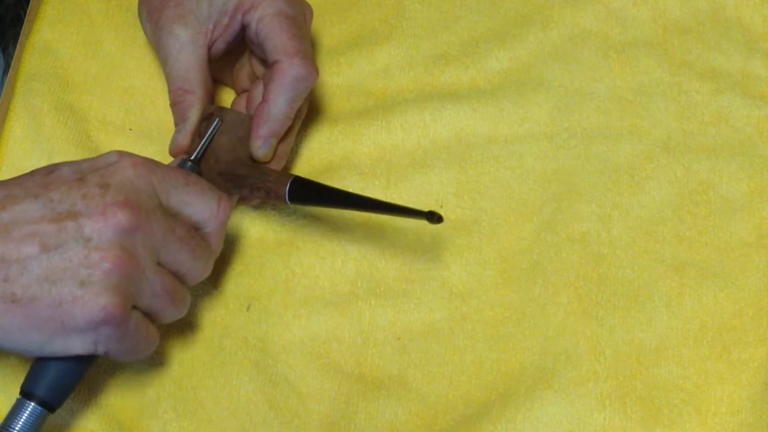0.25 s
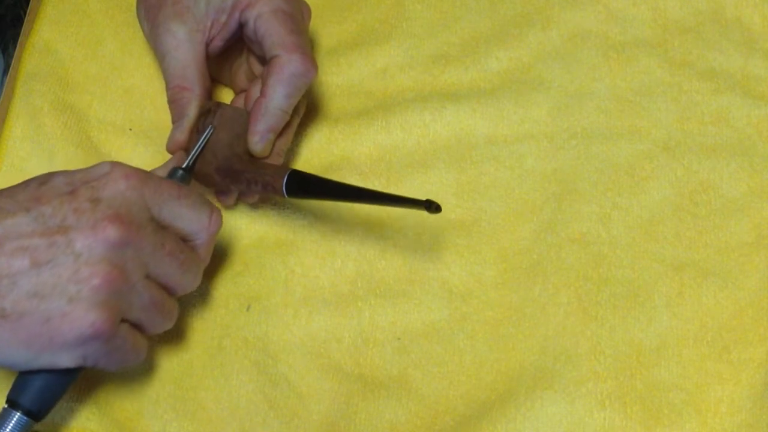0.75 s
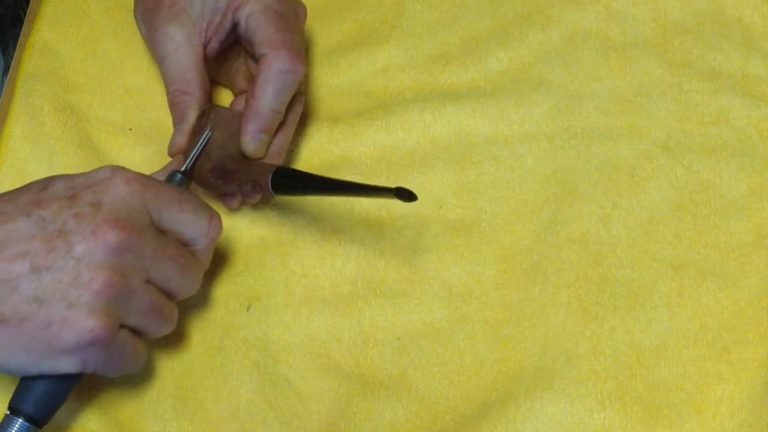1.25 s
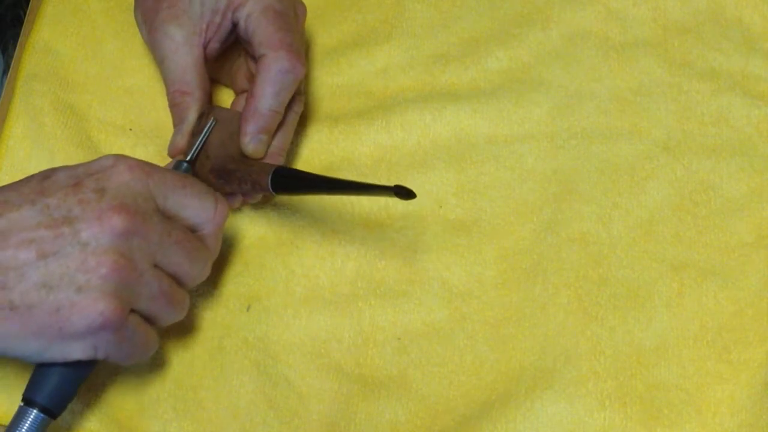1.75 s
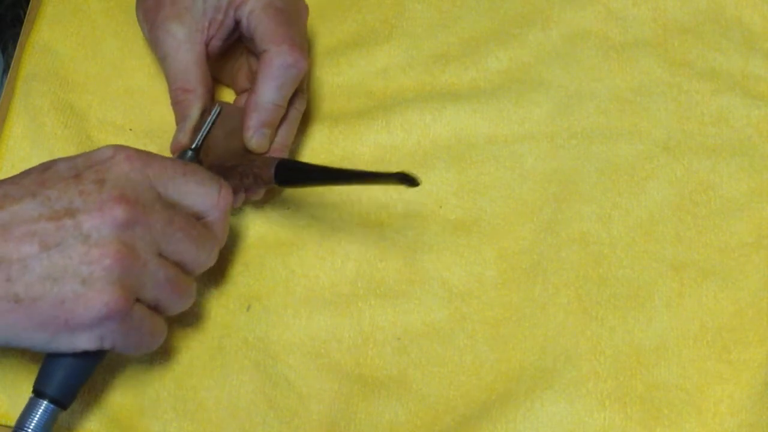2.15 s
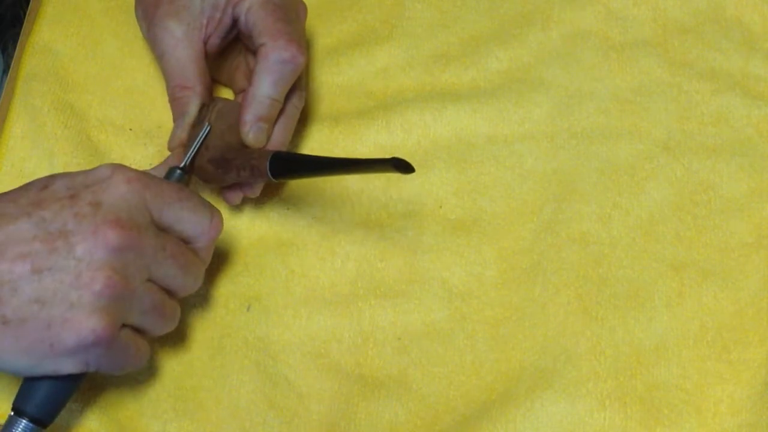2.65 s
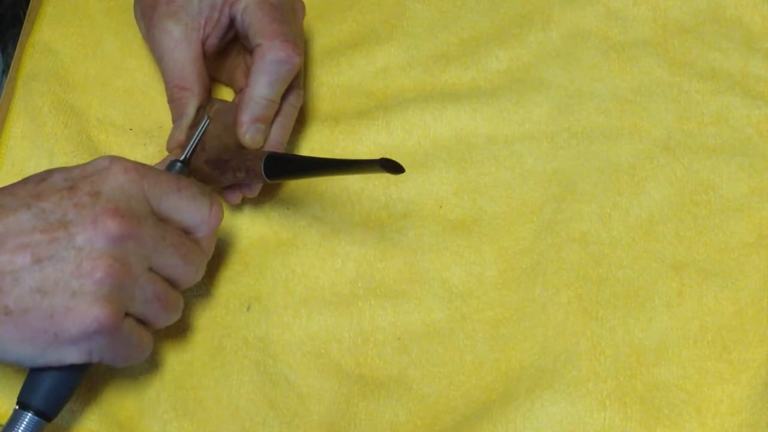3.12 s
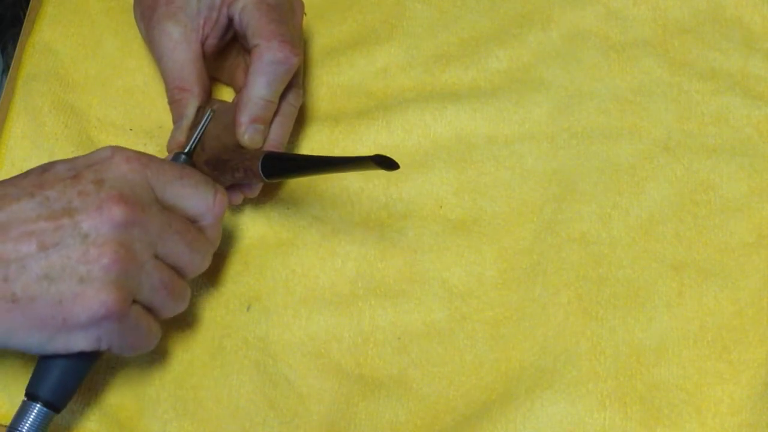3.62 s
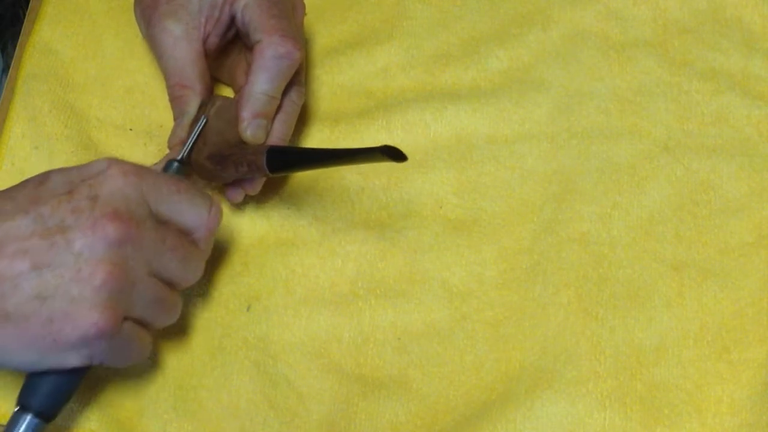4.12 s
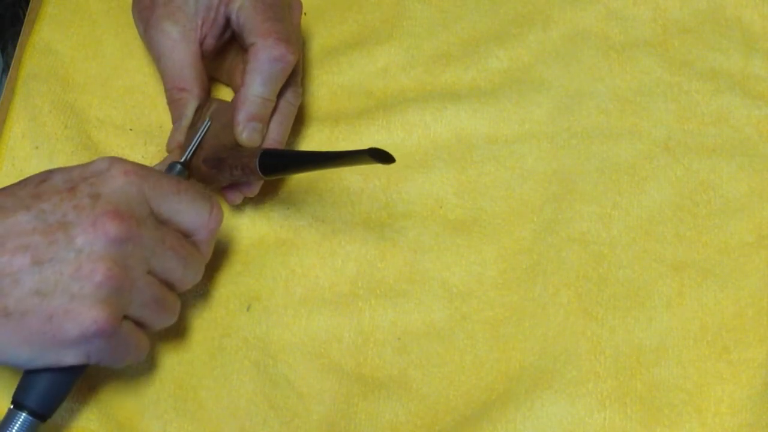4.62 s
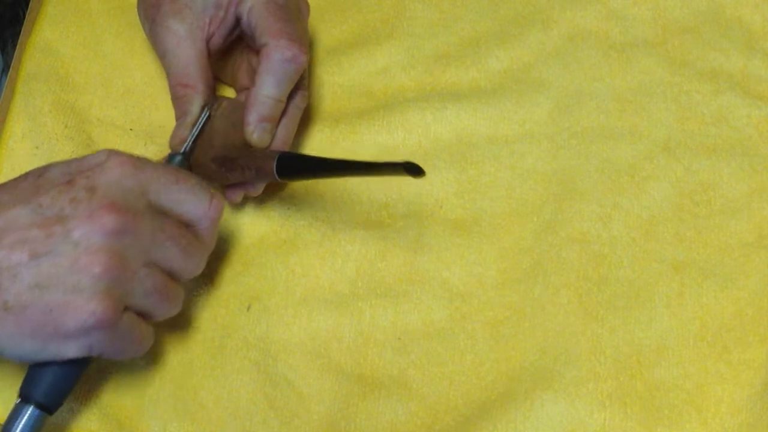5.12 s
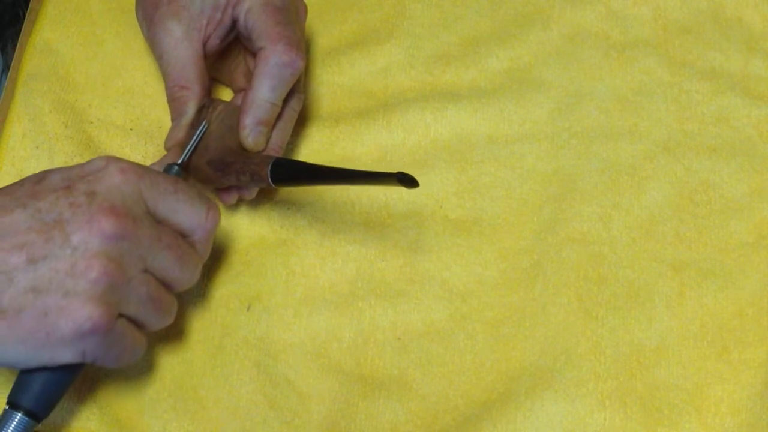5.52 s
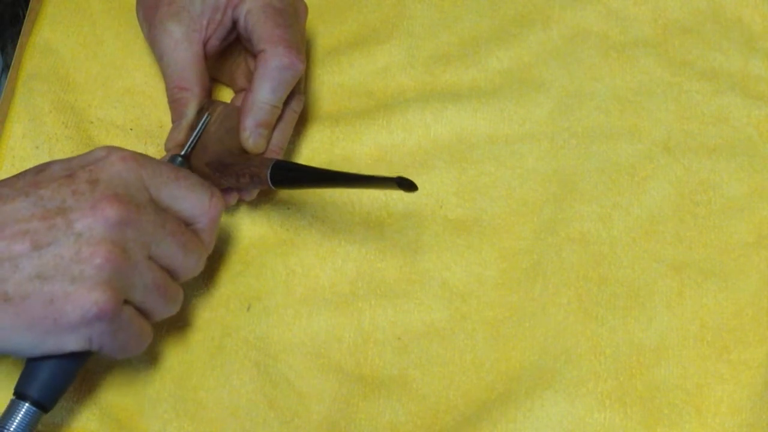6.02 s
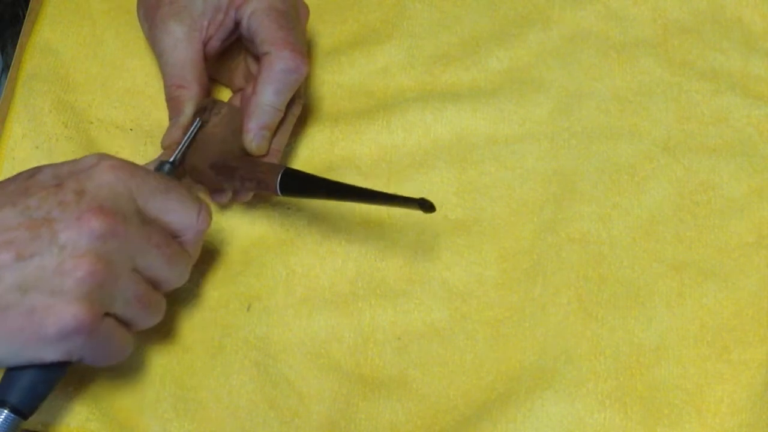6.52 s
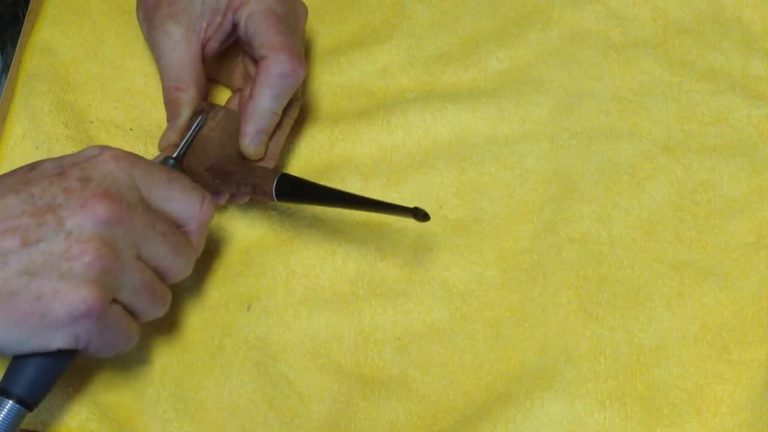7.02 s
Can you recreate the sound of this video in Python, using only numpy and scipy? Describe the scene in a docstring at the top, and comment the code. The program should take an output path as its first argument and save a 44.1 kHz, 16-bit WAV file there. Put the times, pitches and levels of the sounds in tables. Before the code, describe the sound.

Close up in a small room, a metal burr grinds into a small wooden bowl in repeated bursts. Each contact jumps out much louder than the idling motor: a gritty, buzzing rasp with fizzing torn fibres, woody resonance and a shrill chatter that sometimes squeals. Between bursts the steady whirr, mains-throbbing whine and soft air rush of the tool are exposed. Motor pitch wavers slightly and ends a little higher, mid-cut.

```python
"""A rotary tool at about 13000 rpm is already pressing its burr into a wooden pipe bowl as the sound opens.
Seven strokes follow one another, parted by short lifts; the seventh is still cutting at the end.
Throughout, the motor hums on its shaft orders, its commutator whine throbs with the chopped mains and its fan rushes.
In each stroke the burr bites once a turn: blows and torn fibres ring wood and steel, and strong chatter squeals.
A small room answers the motor and the cut."""
import sys
import numpy as np
from scipy import signal
from scipy.fft import rfft, irfft, next_fast_len
from scipy.io import wavfile
from scipy.ndimage import uniform_filter1d, map_coordinates

SR = 44100
rng = np.random.default_rng(int(sys.argv[2]) if len(sys.argv) > 2 else 0)


def master_out(mix):
    """Clip the mix to full scale and print it as 16-bit PCM to the path in sys.argv[1]."""
    frames = np.transpose(np.atleast_2d(mix))
    ceiling = np.clip(frames, -1, 1)
    pcm = np.round(ceiling * 32767).astype(np.int16)
    wavfile.write(sys.argv[1], SR, pcm)


N = 320166

# rotation of the shaft: (time_s, speed_turns_per_s)
SHAFT_SPEED = [(0.0, 209.0), (0.1, 208.4), (0.44, 211.9), (0.97, 207.2), (1.23, 212.6), (1.41, 212.4),
               (1.64, 209.1), (2.12, 205.4), (2.38, 212.1), (2.79, 218.4), (2.93, 214.5), (3.3, 215.6),
               (3.78, 205.4), (3.82, 202.3), (3.98, 204.3), (4.25, 213.2), (4.45, 217.4), (4.69, 215.9),
               (5.02, 209.9), (5.52, 220.1), (5.78, 219.4), (6.03, 213.6), (6.91, 224.9), (7.26, 223.5)]
# lines of shaft, fan and bearings, before the housing: (shaft_multiple, level_db)
WHINE_ORDERS = [(2, -75), (5, -71), (8, -69), (13, -72), (17, -74), (19, -74), (21, -73), (27, -73),
                (29, -73), (35, -72), (37, -65.5), (40, -65.5), (43, -76), (48, -74), (50, -77),
                (56, -68.5), (64, -82)]
# lines driven by the current pulses: (shaft_multiple, level_db)
COMMUTATOR_ORDERS = [(8, -61.5), (16, -51.3)]
# rougher lines of the ball bearings, before the housing: (shaft_multiple, level_db)
BEARING_ORDERS = [(6.05, -60), (9.08, -63), (12.12, -67), (21.2, -68)]
# the hum's strongest line, the fourth shaft order: (time_s, level_db)
FOURTH_ORDER = [(0.0, -59.5), (0.38, -57.5), (0.93, -68), (1.01, -56), (1.88, -67), (2.47, -56.5),
                (2.93, -63.5), (3.09, -56.5), (3.88, -64.5), (3.9, -56), (4.02, -58.5), (4.49, -57),
                (4.89, -72), (4.99, -58), (5.68, -58), (6.03, -71), (6.13, -58), (7.26, -63)]
# spectrum of the brushes' ticking: (frequency_hz, relative_level_db)
BRUSH_SPECTRUM = [(500, -25), (1500, 0), (6000, 0), (9000, -2), (12000, -4), (15000, -12)]
# what the motor's housing lets out of the gliding lines: (frequency_hz, gain_db)
HOUSING_GAIN = [(1310, 0), (1370, -6), (1600, 0), (12100, 0), (12500, -6)]
# spectrum of the cooling air with the room's rumble: (frequency_hz, relative_level_db)
AIR_SPECTRUM = [(25, -22), (60, -9.5), (190, -5.5), (320, -10.5), (560, -6), (950, -4.5), (1300, .5),
                (1480, -3.5), (2100, -1.5), (2650, 1.2), (3000, -4), (3500, -2), (4500, 2.3), (5200, -4),
                (6800, -8.5), (8500, -7.3), (11000, -14), (15300, -16)]
# strokes of the burr; the spot it works on favours some parts:
# (start_s, end_s, landing_s, lift_off_s, first_pressure_db, middle_pressure_db, last_pressure_db,
#  extra_bowl_db, extra_chatter_db, extra_shank_db, extra_fizz_db)
BURR_STROKES = [(-.1, 0.208, .01, .06, 2, -0.5, 2, 1.3, -3.5, -8, -3.5),
                (0.23, 1.007, 0.022, 0.018, -8.5, -0.5, -3.5, -0.81, 0, -4.5, -3.5),
                (1.211, 2.199, .03, .05, -5.5, -2.5, 4.5, -0.75, 0.5, 0.5, 3.5),
                (2.77, 4.049, 0.021, 0.073, -6, 0.5, 5.5, 1.7, 1, 1.5, 1.5),
                (4.383, 5.112, .04, .01, -7.5, 0, 0.5, -0.7, -0.5, -2.5, 3),
                (5.484, 6.414, .025, 0.055, -2.5, -2, -2, 2.6, -2.5, -.5, 0),
                (6.893, 7.4, 0.0011, .03, -2, -2.5, 2, 2.7, 0.5, -1, -1)]
# the burr digs into the grain or, below zero, skims it: (centre_s, half_length_s, extra_pressure_db)
GRAIN_SNAGS = [(0.077, .015, 3.5), (0.301, .02, 8), (0.392, .04, -1.5), (0.66, 0.028, 1.5),
               (0.835, 0.018, 4.5), (1.565, 0.058, 5), (1.931, 0.0063, 5.5), (3.287, 0.09, -4.5),
               (3.67, 0.033, 3.5), (3.857, .025, 2), (4.792, 0.044, 0.5), (4.943, 0.053, 3.5),
               (5.093, 0.0041, 5.5), (5.839, .025, 6.5), (6.347, .018, 4.5), (6.899, .01, 5.5),
               (6.96, 0.011, 4), (7.08, 0.065, -4.5)]
# one part is struck just right and sings out: (centre_s, half_length_s, part, extra_level_db)
PART_FLARES = [(2.09, .03, "rasp", 2.5), (5.975, 0.063, "rasp", 11.5), (0.783, 0.1, "bowl", 7.5),
               (.96, 0.075, "bowl", 5), (2.128, .02, "bowl", 7), (3.0, 0.028, "bowl", 2),
               (3.95, 0.044, "bowl", 4.5), (5.87, .04, "bowl", 1), (1.744, 0.11, "chatter", 5),
               (3.105, 0.12, "chatter", 5.5), (3.867, 0.033, "chatter", 11.5), (6.11, 0.072, "chatter", 11),
               (.58, .04, "shank", 7.5), (0.8, 0.14, "shank", 16.5), (2.851, .035, "shank", 17.5),
               (4.6, 0.13, "shank", 14), (5.834, 0.038, "shank", 12), (.01, 0.033, "fizz", 10),
               (3.98, 0.041, "fizz", 4)]
# each part's answer to pressure: part: (level_db at normal pressure, growth_db_per_db of pressure)
PART_DRIVE = {"rasp": (-43.5, 1.1), "bowl": (-50, 0.32), "chatter": (-44.5, 1.23), "shank": (-56.5, .25),
              "fizz": (-48, 1.26)}
# resonances of the four ringing parts: (frequency_hz, width_hz, relative_level_db)
RASP_MODES = [(3324, 380, 10.5), (3870, 280, 12), (4790, 375, 6), (4930, 200, -20), (5470, 280, 2)]
BOWL_MODES = [(1055, 20, -10), (1389, 51, 11), (1644, 97, 6.5), (1914, 67, 8), (2178, 220, 0),
              (2397, 44, 8)]
CHATTER_MODES = [(2680, 86, 2), (2792, 104, 7), (3058, 113, 0), (3050, 43, 6.5)]
SHANK_MODES = [(5850, 266, -10), (5940, 86, -2)]
# spectrum of the tearing fibres: (frequency_hz, relative_level_db)
FIBRE_SPECTRUM = [(100, -46), (500, -43), (1100, -5.5), (4000, 3.5), (6600, -8), (7200, -8.5), (8100, -2),
                  (8700, 2), (9400, -2), (10300, -11), (12600, -11.5), (13400, -10.5), (14200, -12),
                  (15300, -27)]
# decay of the room: (frequency_hz, t60_s)
ROOM_DECAY = [(200, .25), (3000, .2), (12000, .14)]

MAINS_HZ, SQUEAL_HZ, TOP_HZ = 59.983, 3025, 15300
# the hand trembles; each part's share wanders
TREMBLE_DB, WANDER_DB = 0.07, 1.42
# pressure at which the cut reaches its full depth
FULL_CUT_DB = 7
# third shaft order: level in dB, gain in dB with the burr on the wood, gain in dB per turn/s below mean speed
THIRD_DB, THIRD_LOAD_DB, THIRD_SLOWING_DB = -69.5, 5, .25


def amp(db):
    """Decibel law: 20 dB is a tenfold amplitude."""
    return 10 ** (np.asarray(db) / 20)


def unit(x):
    """Normalization: x at rms 1."""
    return x / np.sqrt(np.mean(x ** 2) + 1e-20)


def clock():
    """Sampling: the time of each sample in seconds."""
    return np.arange(N) / SR


def along(points, hz):
    """Logarithmic interpolation: (frequency, value) points read on a log axis."""
    frequency, value = np.transpose(points)
    return np.interp(np.log(hz + 1), np.log(frequency + 1), value)


def curves(rows):
    """Linear interpolation: one value per sample for each column after the time."""
    time_s, *columns = np.transpose(rows)
    return [np.interp(clock(), time_s, column) for column in columns]


def wobble(rate, size=64):
    """Band-limited randomness: a smooth curve through rate random knots a second."""
    coarse = np.arange(0, N + size, size)
    knots = rng.standard_normal(4096)
    smooth = map_coordinates(knots, [coarse * rate / SR], mode="mirror")
    return np.interp(np.arange(N), coarse, smooth)


def swell(at, half_length):
    """Gaussian envelope: a bell-shaped rise and fall around a moment."""
    return np.exp(-((clock() - at) / half_length) ** 2)


def filtered(x, response):
    """Linear filtering: x times a complex response of frequency."""
    m = next_fast_len(N + SR // 2)
    return irfft(rfft(x, m) * response(np.fft.rfftfreq(m, 1 / SR)), m)[:N]


def coloured(x, spectrum):
    """Spectral shaping: x weighted by the given spectrum, at rms 1."""
    return unit(filtered(x, lambda hz: amp(along(spectrum, hz))))


def rung(x, modes):
    """Modal superposition: x through parallel resonances of alternating sign, at rms 1."""
    def response(hz):
        total = 0
        for k, (centre, width, db) in enumerate(modes):
            damping = 1j * hz * width
            total = total + (-1) ** k * amp(db) * damping / (centre * centre - hz * hz + damping)
        return total

    return unit(filtered(x, response))


def shaft(flutter):
    """Rotation: angle in radians is the integral of speed, here slightly unsteady."""
    speed, = curves(SHAFT_SPEED)
    return 2 * np.pi * np.cumsum(speed) / SR + flutter * wobble(25)


def orders(angle, lines, waver_db, drift, drift_rate=30):
    """Order locking: lines at multiples of the shaft angle, each wavering in level and phase."""
    total = np.zeros(N)
    for k, db in lines:
        level = amp(db + waver_db * (wobble(3.156) + wobble(22)))
        total += level * np.sin(k * angle + drift * wobble(drift_rate))
    return np.sqrt(2) * total


def once_a_turn(angle, scatter, change_rate, shift_db, count=68):
    """Fourier series: harmonics of one turn form a repeated blow whose shape drifts."""
    blow, lag = np.zeros(N), np.zeros(N)
    for k in range(4, count):
        lag = lag + scatter * wobble(change_rate)
        blow += amp(shift_db * wobble(change_rate)) * np.sin(k * angle + lag)
    return unit(blow)


def commutator(angle, throb, chirp):
    """Modulation: lines swell and bend in phase with each half wave of the mains."""
    mains = 4 * np.pi * MAINS_HZ * clock() - np.pi / 2
    current = unit(np.exp(throb * np.cos(mains) + wobble(50) / 10))
    bend = chirp * np.cos(mains + np.pi / 8)
    return np.sqrt(2) * sum(amp(db) * current * np.sin(k * angle + bend) for k, db in COMMUTATOR_ORDERS)


def motor(angle, touch, throb, chirp):
    """Rotating-machine sound: shaft orders, bearings, brushes and commutator lines add up."""
    speed, = curves(SHAFT_SPEED)
    load = uniform_filter1d(touch, size=SR // 10)
    third_db = THIRD_DB + THIRD_LOAD_DB * load + THIRD_SLOWING_DB * (speed.mean() - speed)
    fourth_db, = curves(FOURTH_ORDER)
    hum = orders(angle, [(3, third_db)], waver_db=1.65, drift=1.0)
    hum += orders(angle, [(4, fourth_db)], waver_db=1.1, drift=0.61)
    whine = orders(angle, WHINE_ORDERS, waver_db=1.2, drift=.5)
    bearings = orders(angle, BEARING_ORDERS, waver_db=3.27, drift=1.05, drift_rate=120)
    ticking = once_a_turn(angle, scatter=1.5, change_rate=5, shift_db=3)
    brushes = amp(-59) * coloured(ticking, BRUSH_SPECTRUM)
    housed = filtered(whine + bearings, lambda hz: amp(along(HOUSING_GAIN, hz)))
    return hum + commutator(angle, throb, chirp) + housed + brushes


def air(level_db, swirl_db):
    """Turbulence: the fan's rush is shaped noise whose level swirls a little."""
    return amp(level_db + swirl_db * wobble(22)) * coloured(rng.standard_normal(N), AIR_SPECTRUM)


def hand():
    """Forcing: strokes, snags and flares set contact (0-1), pressure (dB) and each part's extra dB."""
    t = clock()
    touch, pressure_db = np.zeros(N), TREMBLE_DB * wobble(14)
    extra_db = {part: np.zeros(N) for part in PART_DRIVE}
    for start, end, landing, lift, first_db, middle_db, last_db, *spot_db in BURR_STROKES:
        on = np.clip((t - start) / landing, 0, 1) * np.clip((end - t) / lift, 0, 1)
        touch += on
        stroke_db = np.interp(t, [start, (start + end) / 2, end], [first_db, middle_db, last_db])
        pressure_db += (on > 0) * stroke_db
        for part, db in zip(("bowl", "chatter", "shank", "fizz"), spot_db):
            extra_db[part] += (on > 0) * db
    for at, half_length, db in GRAIN_SNAGS:
        pressure_db += db * swell(at, half_length)
    for at, half_length, part, db in PART_FLARES:
        extra_db[part] += db * swell(at, half_length)
    return touch, pressure_db, extra_db


def flicker(depth_db):
    """Intermittent contact: the burr's spot on the wood shifts, so a part rings in short bursts."""
    return unit(amp(depth_db * wobble(40)))


def squeal(angle, depth, drift):
    """Stick-slip: a pitch of its own, modulated once a turn and so flanked by sidebands."""
    phase = 2 * np.pi * SQUEAL_HZ * clock() + drift * wobble(11) + 0.16 * wobble(150)
    return unit(np.exp(depth * np.cos(angle)) * np.sin(phase + 0.67 * np.cos(angle)))


def grinding(angle, pressure_db, extra_db, focus, uneven_db, shake_db, squeal_from_db):
    """Forced vibration: blows and freshly torn fibres, both once a turn, excite bowl and burr."""
    # the burr's high side strikes; the blow's shape drifts as the wood wears away
    blows = once_a_turn(angle, scatter=0.85, change_rate=13, shift_db=3.5)
    fibres = unit(np.exp(focus * np.cos(angle)) * rng.standard_normal(N))
    bite = amp(uneven_db * wobble(200) + 0.73 * wobble(28))
    level = {}
    for part, (db, growth) in PART_DRIVE.items():
        level[part] = db + growth * pressure_db + extra_db[part] + WANDER_DB * wobble(12)
    # a deep cut tears more fibres than a light one
    depth = amp((pressure_db - FULL_CUT_DB) / 2)

    def force(rough):
        """Power sharing: blows and torn fibres divide the cutting force."""
        share = np.clip(rough * depth, 0, 1)
        return bite * (np.sqrt(1 - share) * blows + np.sqrt(share) * fibres)

    smooth, medium, coarse = force(.15), force(.7), force(1.2)
    rasp = amp(level["rasp"]) * rung(medium, RASP_MODES)
    bowl = amp(level["bowl"]) * flicker(2) * rung(smooth, BOWL_MODES)
    # strong chatter breaks loose from the turning and squeals
    loose = np.clip((level["chatter"] - squeal_from_db) / 10, 0, .75)
    locked = np.sqrt(1 - loose) * flicker(1.73) * rung(medium, CHATTER_MODES)
    free = np.sqrt(loose) * bite * squeal(angle, depth=0.29, drift=1.95)
    chatter = amp(level["chatter"]) * (locked + free)
    shank = amp(level["shank"]) * rung(smooth, SHANK_MODES)
    fizz = amp(level["fizz"]) * coloured(coarse, FIBRE_SPECTRUM)
    # the cut also shakes the hands and the table
    rumble = rung(rng.standard_normal(N), [(170, 50, 0), (210, 30, -1)])
    shake = amp(level["rasp"] + shake_db) * rumble
    return rasp + bowl + chatter + shank + fizz + shake


def room(x):
    """Reverberation: each frequency of the walls' answer decays at its own rate."""
    hz, t, z = signal.stft(rng.standard_normal(SR // 2), SR, nperseg=256)
    decay = amp(-60 * t / along(ROOM_DECAY, hz)[:, None])
    tail = signal.istft(z * decay, SR, nperseg=256)[1]
    # the answer sets in 5 ms after the direct sound
    response = np.pad(tail / np.linalg.norm(tail), (SR // 200, 0))
    return signal.fftconvolve(x, response)[:N]


def scene():
    """Superposition: motor and cut share one shaft; the motor, farther off, sends more to the room."""
    angle = shaft(flutter=.008)
    touch, pressure_db, extra_db = hand()
    tool = motor(angle, touch, throb=1.15, chirp=1.3)
    fan = air(level_db=-51.3, swirl_db=.2)
    cut = touch * grinding(angle, pressure_db, extra_db, focus=0.59, uneven_db=1.4,
                           shake_db=-31, squeal_from_db=-40.5)
    walls = room(amp(-13) * cut + amp(-12) * tool)
    return (tool + fan + cut + walls)[None]


def record(dry):
    """Band limiting: nothing passes at or above the top frequency."""
    return filtered(dry[0], lambda hz: hz < TOP_HZ)[None]


dry = scene()
out = record(dry)
master_out(out)
```